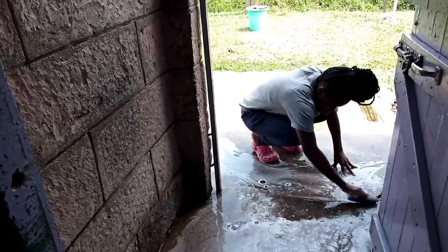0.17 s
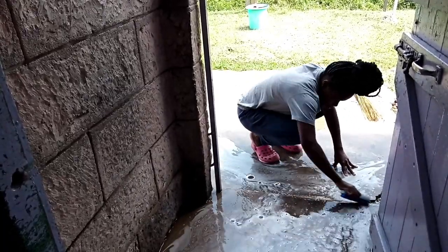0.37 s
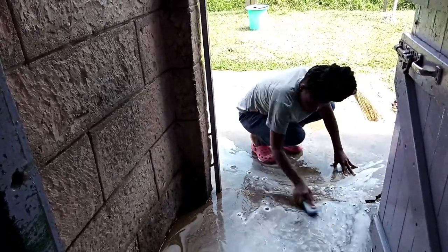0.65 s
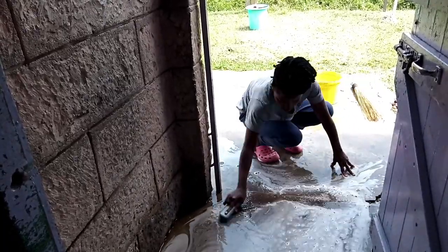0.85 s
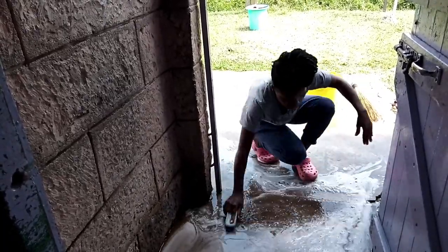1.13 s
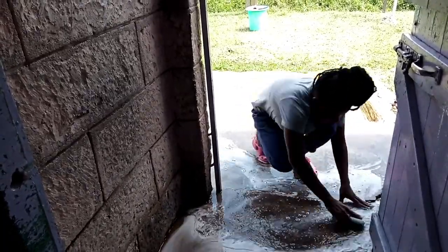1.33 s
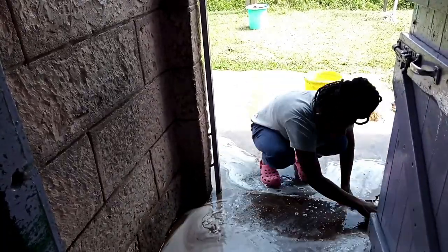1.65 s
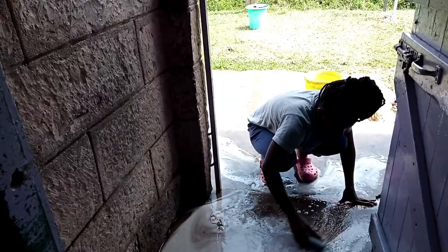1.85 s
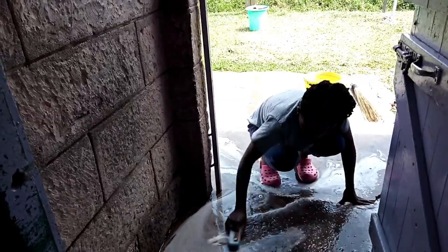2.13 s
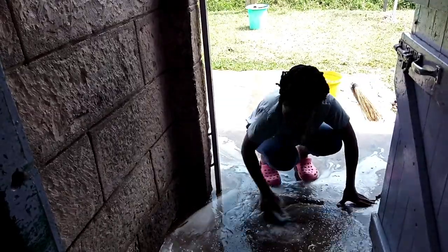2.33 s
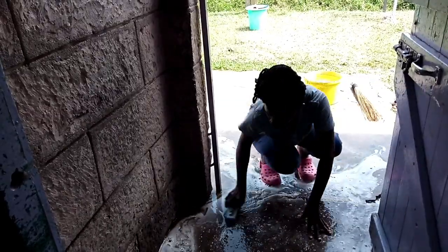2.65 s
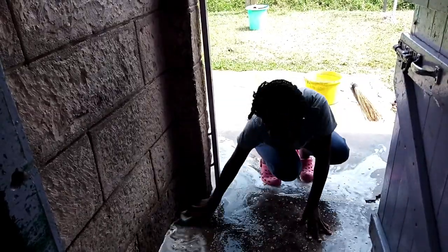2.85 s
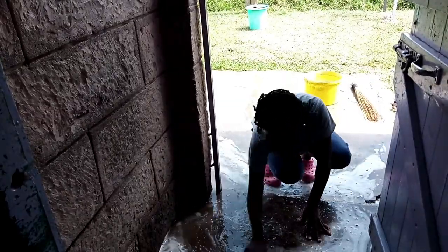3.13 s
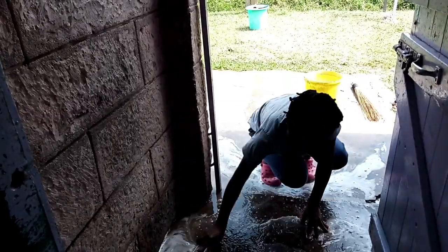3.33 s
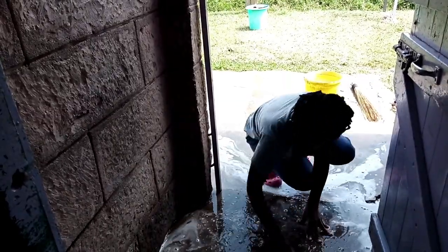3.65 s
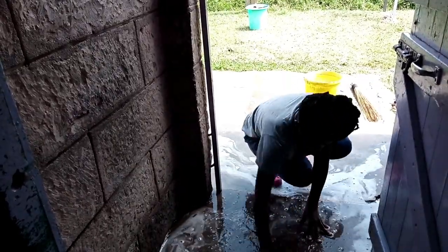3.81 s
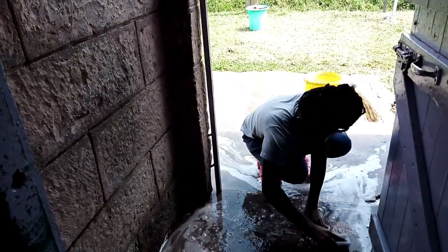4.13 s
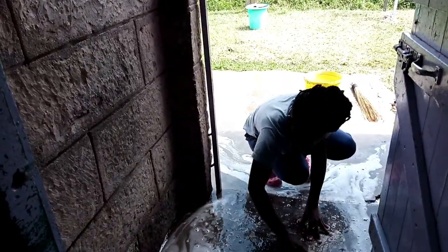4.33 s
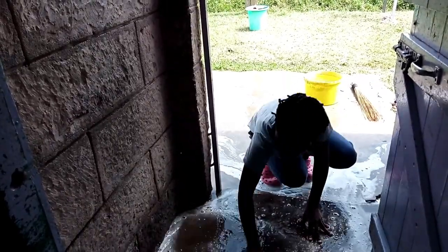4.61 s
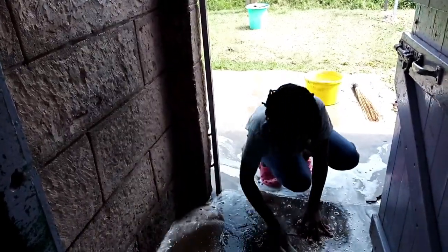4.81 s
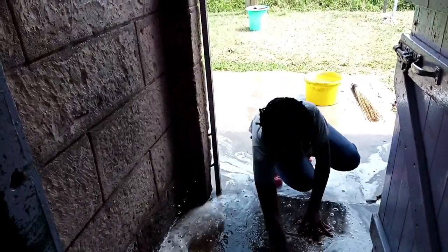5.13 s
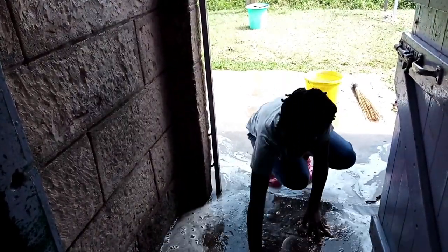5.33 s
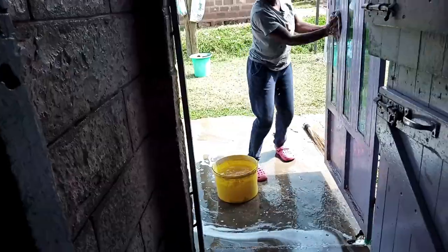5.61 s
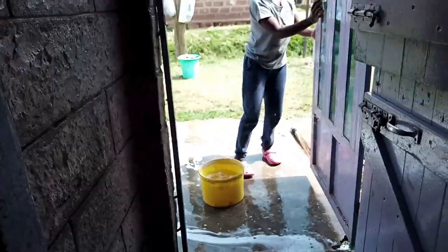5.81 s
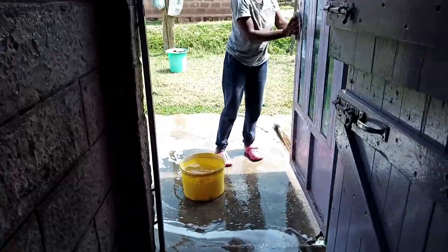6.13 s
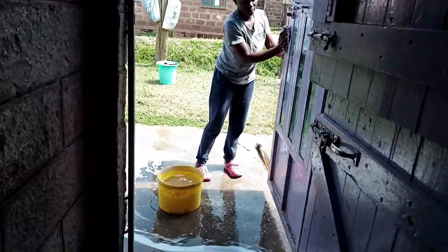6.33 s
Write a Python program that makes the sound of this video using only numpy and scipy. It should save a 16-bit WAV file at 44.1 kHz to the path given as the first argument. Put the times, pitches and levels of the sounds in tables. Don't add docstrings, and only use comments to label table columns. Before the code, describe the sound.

From the start until about 5.5 s, a stiff brush scrubs wet concrete a step from a mono phone microphone. Strokes turn roughly every tenth of a second, irregular in strength, each rasping with gritty bristles and a burst of fine watery spray, some almost stopping at the turn. The first second is brisk and bright; from about 1 s the wooden back drags more, giving a lower scrape. A clear hollow knock lands at 1.5 s, with smaller bumps or skids near 1.15, 1.75, 3.0, 3.25, 4.9 and 5.3 s. Stone adds a short dense echo; faint low traffic sits underneath. At 5.55 s everything cuts to a very brief silence. From 5.57 to about 6.4 s a far engine thuds and drones low, while a damp cloth gives one quick swish, then faint hiss and small ticks, strongest around 5.65 and 6.3 s, and a dull low bump at 6.4 s.

```python
import sys
import numpy as np
from scipy import signal
from scipy.fft import rfft, irfft, next_fast_len
from scipy.io import wavfile
from scipy.ndimage import uniform_filter1d

SR = 44100
rng = np.random.default_rng(int(sys.argv[2]) if len(sys.argv) > 2 else 0)


def bounce(signal):
    frames = np.transpose(np.atleast_2d(signal))
    limited = np.clip(frames, -1, 1)
    pcm = np.round(limited * 32767).astype(np.int16)
    wavfile.write(sys.argv[1], SR, pcm)


def gain_from_db(level_db):
    decades = np.asarray(level_db, float) / 20
    return 10 ** decades


N = 284886
T = np.arange(N) / SR
HALF = next_fast_len(N // 2 + 2048)
HZ = np.arange(HALF + 1) * SR / 2 / HALF + 1e-3
CUT_S, BACK_S = 5.5465, 5.570


def level(x, db=0):
    return x * gain_from_db(db) / np.sqrt(np.mean(x ** 2))


def curve(table):
    s, db = np.transpose(table)
    return np.interp(T, s, db)


def tone(points):
    hz, db = np.transpose(points)
    return gain_from_db(np.interp(np.log(HZ), np.log(hz), db))


def ring(modes):
    return sum(gain_from_db(db) / (1 + ((HZ - hz) / (width / 2)) ** 2) for hz, width, db in modes)


def shape(x, gain):
    return irfft(rfft(x, 2 * len(HZ) - 2) * gain)[:N]


def noise():
    return rng.standard_normal(N)


def walk(rate_hz):
    k = int(SR / rate_hz)
    held = np.repeat(rng.standard_normal(N // k + 1), k)
    return 1.31 * uniform_filter1d(uniform_filter1d(held, k), k)[:N]


def slips(rate_hz, spread_db):
    hit, sign, size = rng.random(N), rng.standard_normal(N), rng.exponential(size=N)
    return (hit < rate_hz / SR) * sign * gain_from_db(spread_db * size)


# (frequency [Hz], level [dB])
MIC_TONE = [(3000, -1.5), (5100, 0), (5800, 3), (6460, 8), (6900, 1.5), (7400, -2.5), (8200, -13),
            (9300, -19.5), (13600, -27.5), (14300, -22), (14800, -14), (15700, -21)]


def microphone(x):
    return shape(x, tone(MIC_TONE))


def heard(x):
    return x / np.sqrt(np.mean(microphone(x) ** 2))


# (turn [s], depth of stop [dB], stroke
# level [dB], lean on bristles [dB], drag of back [dB])
BRUSH_STROKES = [(0.0, 0.0, -24.5, -4.3, -16.8), (0.055, 11.2, -30.3, 0.7, -7.1),
                 (0.171, 19.3, -25.7, -7.3, -15.7), (0.255, 0.3, -25.6, -1.2, -9.2),
                 (0.338, 34.6, -28.9, -3.3, -5.6), (0.436, 28.6, -27.6, -4.5, -8.9),
                 (0.544, 37.3, -26.2, -2.6, -8.0), (0.693, 9.0, -27.1, -1.2, 0.9),
                 (0.827, 14.6, -28.5, 0.6, -4.6), (0.972, 9.9, -28.5, 2.1, 3.7),
                 (1.092, 11.8, -26.9, -0.9, -0.7), (1.175, 0.3, -30.7, -4.6, 0.2),
                 (1.26, 4.1, -34.0, 3.7, 7.1), (1.365, 0.3, -37.7, 4.4, 16.2),
                 (1.473, 52.4, -30.6, -0.4, 0.6), (1.545, 6.0, -29.6, -1.0, -0.9),
                  (1.63, 9.7, -30.0, -3.0, -0.3), (1.697, 10.6, -29.3, 0.2, 5.0),
                  (1.764, 11.3, -27.1, -3.3, -0.8), (1.84, 17.2, -28.1, -2.4, 2.4),
                  (1.94, 0.3, -32.3, 2.6, 8.8), (2.035, 8.3, -29.4, 2.5, 12.2),
                  (2.133, 6.4, -27.1, -1.1, 0.3), (2.279, 7.8, -31.4, 7.7, 14.2),
                  (2.385, 6.2, -27.1, 0.7, -3.0), (2.523, 1.3, -28.5, 1.3, 4.2),
                  (2.64, 0.3, -29.8, -1.6, -0.8), (2.745, 0.3, -31.7, 0.0, 1.2),
                  (2.86, 12.3, -33.6, 3.4, 2.2), (2.94, 27.4, -33.9, 0.2, 1.4),
                  (3.044, 12.8, -29.7, 1.8, -1.6), (3.118, 25.3, -28.9, 2.2, 1.7),
                 (3.22, 0.3, -31.9, -2.9, 0.6), (3.32, 5.0, -28.3, -0.7, 2.3),
                (3.444, 4.4, -28.7, 2.1, -2.8), (3.603, 4.0, -28.2, 1.3, -1.8),
                (3.73, 3.9, -25.5, -1.5, 0.6), (3.838, 3.6, -26.7, 2.3, 3.9), (3.95, 2.3, -29.3, 3.1, 0.1),
                (4.061, 18.6, -27.6, 0.9, 0.7), (4.142, 18.6, -29.4, 0.6, -0.0),
                (4.24, 15.4, -25.4, -2.9, -4.5), (4.331, 18.7, -30.1, 7.1, 6.2),
                (4.408, 2.2, -26.9, -2.1, -8.8), (4.49, 0.3, -31.0, 1.0, 6.9),
                (4.576, 6.0, -31.8, 3.3, 11.8), (4.7, 0.3, -30.2, -0.2, 4.7),
                (4.821, 5.2, -27.2, -2.1, -1.5), (4.925, 2.8, -26.5, -0.3, 2.6),
                (5.025, 4.1, -33.8, 3.0, 8.6), (5.131, 23.6, -26.7, 4.4, 3.0), (5.22, 0.3, -30.6, 4.3, 9.8),
                (5.318, 3.3, -26.8, -3.9, -1.6), (5.483, 14.0, -25.8, 2.1, 2.2)]


def strokes():
    s, stop_db, db, lean_db, drag_db = np.transpose(BRUSH_STROKES)
    ends = np.append(s[1:], CUT_S)
    speed, fresh = np.ones(N), np.zeros(N)
    for turn, before, end, depth_db in zip(s[1:], s, ends[1:], np.abs(stop_db[1:])):
        stop = gain_from_db(-1.2 * depth_db)
        slowing_s = 0.3 * (turn - before) + 0.0012 * depth_db
        speeding_s = 0.017 + 0.0005 * depth_db
        near = slice(int((turn - slowing_s) * SR), int(end * SR))
        after_s = T[near] - turn
        away = np.where(after_s < 0, -after_s / slowing_s, after_s / speeding_s)
        speed[near] *= 1 - (1 - stop) * np.clip(1 - away, 0, 1) ** 1.12
        freshness = (1 - stop) * (after_s > 0) * np.exp(-np.abs(after_s) / 0.09)
        fresh[near] = np.maximum(fresh[near], freshness)
    level_peak_s = s + 0.47 * (ends - s)
    weight_peak_s = s + 0.62 * (ends - s)
    stroke_db = np.interp(T, level_peak_s, db)
    lean_db, drag_db = (np.interp(T, weight_peak_s, w) for w in (lean_db, drag_db))
    return speed, stroke_db, lean_db, drag_db, fresh


# (centre [Hz], offset [dB], flicker [dB])
BRUSH_PARTS = [
    (870, 1, 2.3),
    (2400, 0.5, 1),
    (5650, -3, -0.1),
    (13000, 5, 0),
]
# (time [s], spray relative to stroke [dB])
FLOOR_WETNESS = [(0.0, -15.94), (0.3, -15.42), (0.42, -21.71), (0.65, -16.17), (1.15, -16.5), (1.4, -17.34),
                 (1.55, -23.27), (2.05, -17.0), (2.45, -14.36), (2.9, -16.1), (3.1, -20.78), (3.5, -12.85),
                 (3.8, -14.41), (4.25, -17.46), (4.6, -15.48), (4.85, -14.59), (5.15, -17.61),
                 (5.5, -14.41)]


def brush():
    speed, stroke_db, lean_db, drag_db, fresh = strokes()
    drag_db = -19.2 + drag_db - 6 * fresh
    scrape_db = -8.5 + lean_db - 5.5 * fresh
    spray_db = curve(FLOOR_WETNESS) + 7 * fresh - 0.9
    tips = slips(16000 * speed ** 0.5, -0.7) * speed ** 0.72 * gain_from_db(1.03 * walk(90))
    roots = noise() * speed ** 0.78
    drops = slips(20000, 1.1) * speed ** 1.6
    spray = tips + 0.91 * level(drops) * tips.std()
    layers = [(roots, drag_db), (tips, scrape_db), (tips, 0), (spray, spray_db)]
    low_end = tone([(300, -20), (650, -13.5), (900, -4.5), (1200, 3.0), (1500, 2.5), (2000, 5.0)])
    centres = np.log([p[0] for p in BRUSH_PARTS])
    bands = np.eye(len(BRUSH_PARTS))
    out = 0
    for (source, rel_db), band, (_, offset_db, flicker_db) in zip(layers, bands, BRUSH_PARTS):
        share = np.interp(np.log(HZ), centres, band)
        part = heard(shape(source, share * low_end))
        out = out + part * gain_from_db(stroke_db + rel_db + offset_db + flicker_db * walk(25.11))
    return out


def doorway(x, size=8192):
    t60_s, echo_db = 0.057, -11
    t, out = T[:size], x.copy()
    fade = gain_from_db(-60 * t / t60_s) * (t > 0.003)
    fade /= np.sqrt(np.sum(fade ** 2))
    for i in range(0, N - 3 * size, size // 2):
        tail = rng.standard_normal(size) * fade
        echo = signal.fftconvolve(x[i:i + size] * np.hanning(size), tail)
        out[i:i + 2 * size - 1] += gain_from_db(echo_db) * echo
    return out


# (frequency [Hz], density [dB per Hz])
TRAFFIC_TONE = [(12, -59), (20, -35), (81, -1), (140, -3), (167, -10), (203, -4.5), (280, -17.5),
                (360, -48), (620, -120)]
# (time [s], level [dB])
TRAFFIC_LEVEL = [(0, -51.5), (.9, -54), (1.2, -54), (1.6, -50.5), (2.6, -55), (3.4, -53), (3.7, -56),
                 (4.15, -51), (4.8, -52.5), (5.5, -55)]
# (frequency [Hz], width [Hz], level [dB])
DOORWAY_MODES = [(335.8, 21, 0.5), (369.3, 18, -3.5), (419.6, 34, -6.5), (466, 10.6, -9),
                 (600, 1200, -21.5)]
# (time [s], length [s], lowest mode [dB], upper modes [dB])
VEHICLE_SWELLS = [(0.025, 0.098, -49, -60), (0.464, .1, -60.5, -53), (0.716, 0.035, -61, -67),
                  (1.0, .06, -64, -56), (1.198, 0.091, -58, -54), (1.58, 0.19, -53.5, -52),
                  (1.95, 0.16, -59, -64), (2.324, 0.052, -52, -74), (2.498, .08, -57, -68),
                  (2.957, 0.097, -60, -56), (3.126, 0.073, -51, -61), (3.38, 0.14, -64, -53.5),
                  (3.563, .07, -55, -62), (3.8, 0.12, -51, -61), (4.18, .2, -49, -49),
                  (4.555, 0.19, -59, -53), (5.06, .1, -55, -53.5), (5.433, 0.12, -56, -60.5)]


def yard():
    traffic = level(shape(noise(), tone(TRAFFIC_TONE)))
    traffic = traffic * gain_from_db(curve(TRAFFIC_LEVEL) + 1.0 * walk(6.9))
    low_gain = high_gain = gain_from_db(-66.5)
    for s, length_s, low_db, high_db in VEHICLE_SWELLS:
        swell = np.exp(-((T - s) / length_s) ** 2)
        low_gain = low_gain + gain_from_db(low_db) * swell
        high_gain = high_gain + gain_from_db(high_db) * swell
    lowest, *upper = (shape(noise(), ring([m])) * gain_from_db(1.8 * walk(4.17)) for m in DOORWAY_MODES)
    hiss = heard(noise()) * gain_from_db(-51.0)
    return traffic + level(lowest) * low_gain + level(sum(upper)) * high_gain + hiss


# (time [s], peak [dB], pitch [Hz], contact
# [s], pitch fall [octaves/s])
KNOCKS = [(0.999, -43, 370, 0.023, -1), (1.15, -33.5, 389, 0.019, -2), (1.505, -29, 461, 0.042, 1.5),
          (1.509, -26.5, 1080, 0.027, 2), (1.512, -30.5, 755, 0.019, 4), (1.518, -30.5, 255, 0.034, 2),
          (1.669, -38.5, 358, 0.026, 2), (1.742, -34, 730, 0.025, -2), (1.743, -37, 273, 0.022, -2),
          (1.76, -39, 600, 0.034, 8.5), (2.99, -33, 1400, 0.025, 3), (2.99, -35, 910, 0.026, 12),
          (3, -42, 431, 0.019, 3), (3.255, -38.5, 1008, 0.07, 17), (4.896, -37, 130, 0.025, 2),
          (5.29, -39.5, 636, 0.043, -0.5), (6.401, -28.5, 140, 0.019, -1)]


def knocks(size=8192):
    out, t = np.zeros(N), T[:size]
    pushes = rng.standard_normal((len(KNOCKS), size, 2)) @ [1, 1j]
    away_hz = np.abs(np.fft.fftfreq(size, 1 / SR))
    for (s, db, hz, contact_s, fall), push in zip(KNOCKS, pushes):
        width_hz = 34 + 0.11 * hz
        waver = np.fft.ifft(np.fft.fft(push) / (1 + (away_hz / width_hz) ** 2))
        phase = 2 * np.pi * np.cumsum(hz * 2 ** (-fall * t)) / SR
        body = (waver * np.exp(1j * phase)).real
        body *= t / contact_s * np.exp(-2.5 * t / contact_s)
        i = int(s * SR)
        out[i:i + size] += (gain_from_db(db) * body / np.abs(body).max())[:N - i]
    return out


# (frequency [Hz], density [dB per Hz])
THUD_TONE = [(12, -48), (20, -30), (59, -9), (100, -9), (129, -7), (188, -6), (361, -12), (549, -24.5),
             (706, -23.5), (1010, -32), (3000, -46.5), (3900, -85), (6600, -120)]
# (frequency [Hz], width [Hz], level [dB])
DRONE_MODES = [(68.3, 9.2, -5.5), (136.2, 7.2, 2.5), (185.8, 5.4, -3), (255, 16, -8), (690, 5.2, -19),
               (785, 12, -29)]


def engine():
    thuds = level(shape(slips(2500, 0.6), tone(THUD_TONE)), -1.8)
    drone = level(shape(noise(), ring(DRONE_MODES)), -2.1)
    return (thuds + drone) * gain_from_db(-38.5 + 0.8 * walk(9))


def cloth():
    swish_s, swish_db, fall_db_per_s = 5.59, -43.5, 150
    swish = gain_from_db(swish_db - fall_db_per_s * np.maximum(T - swish_s, 0))
    rub = gain_from_db(-59.5 + 1.8 * walk(6.6))
    colour = tone([(800, -11), (2000, -3), (3600, -9), (6000, -3.5), (9000, 4.5), (14000, 5)])
    return heard(shape(slips(22000, 0.73), colour)) * (rub + swish)


# (time [s], rustle [dB], treble [dB], rustle length [s], crack [dB])
CLOTH_TICKS = [(5.65, -46, -12, 0.021, 7), (5.848, -52, -9, .015, 9), (5.903, -60, -12, .012, -2),
               (5.966, -60, -3, .008, 4), (5.974, -57, -12, .012, 7), (6.007, -58, -3, .025, -6),
               (6.049, -52, -7, 0.028, 2), (6.173, -58, -6, .01, 5), (6.219, -55.5, -8, .03, 2),
               (6.2925, -49, -16, 0.015, 9), (6.329, -44, -19, 0.019, 13), (6.352, -55, -24, .006, 6),
               (6.404, -64, 0, .018, -2)]


def ticks():
    dull_tone = tone([(1600, -31), (3400, -5), (8000, 5.0), (10000, -18)])
    bright_tone = tone([(7000, -30), (10000, -5)])
    dull, bright = (heard(shape(noise(), g)) for g in (dull_tone, bright_tone))
    out, t = np.zeros(N), T[:SR // 10]
    for s, db, treble_db, length_s, crack_db in CLOTH_TICKS:
        near = slice(int(s * SR), int(s * SR) + len(t))
        fade = np.exp(-(t / length_s) ** 2) + gain_from_db(crack_db - 60 * t / 0.0047)
        rustle = dull[near] + gain_from_db(treble_db) * bright[near]
        out[near] += gain_from_db(db) * fade[:len(rustle)] * rustle
    return out


def scene():
    scrubbing = doorway(brush()) + yard()
    wiping = engine() + cloth() + ticks()
    mono = np.where(T < CUT_S, scrubbing, wiping) + knocks()
    return np.array([mono, mono])


def top_cut(x):
    return signal.sosfilt(signal.butter(12, 17090, fs=SR, output="sos"), x)


def record(dry):
    fade_out = np.clip((CUT_S - T) / 0.0006, 0, 1)
    fade_in = np.clip((T - BACK_S) / 0.013, 0, 1) ** 2
    rounded = np.tanh(2.5 * microphone(dry[0])) / 2.5
    top_hz = 15830
    mono = shape(rounded * (fade_out + fade_in), HZ < top_hz)
    return top_cut(np.array([mono, mono]))


dry = scene()
out = record(dry)
bounce(out)
```